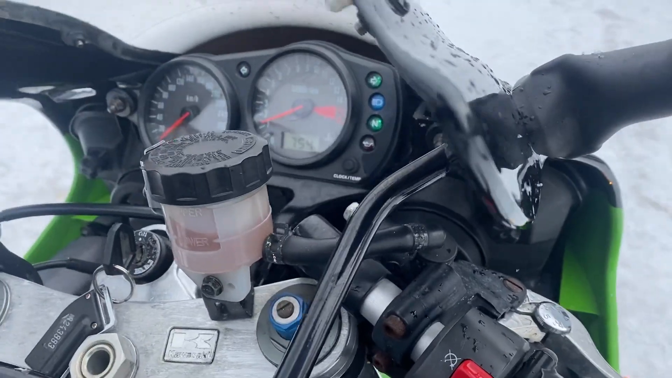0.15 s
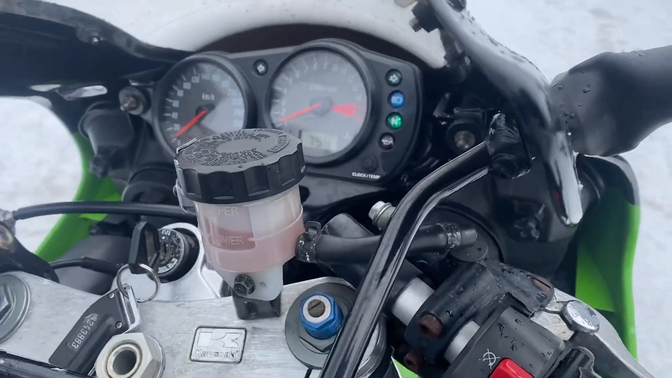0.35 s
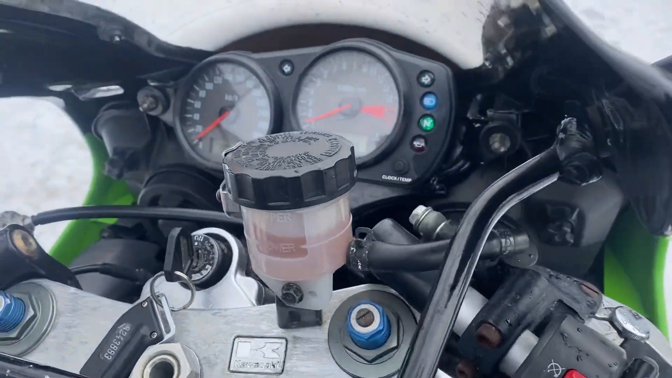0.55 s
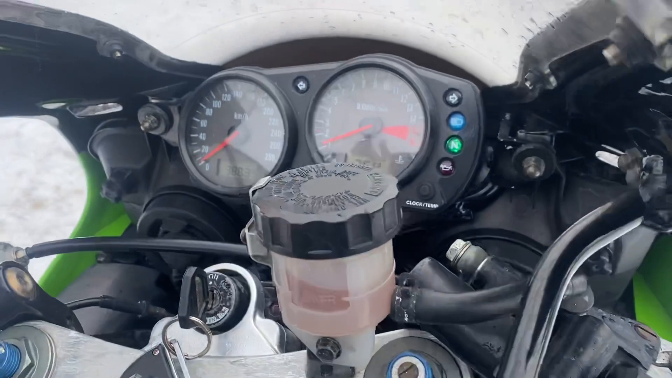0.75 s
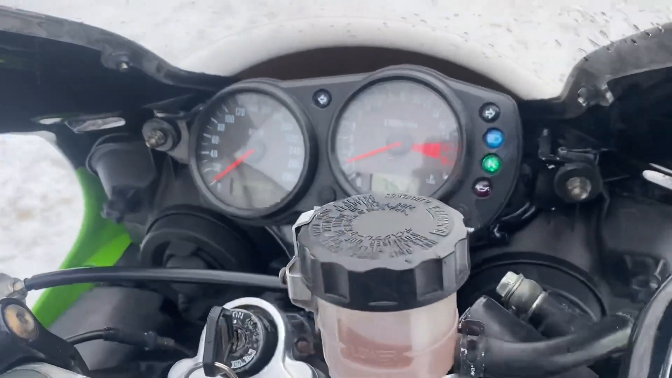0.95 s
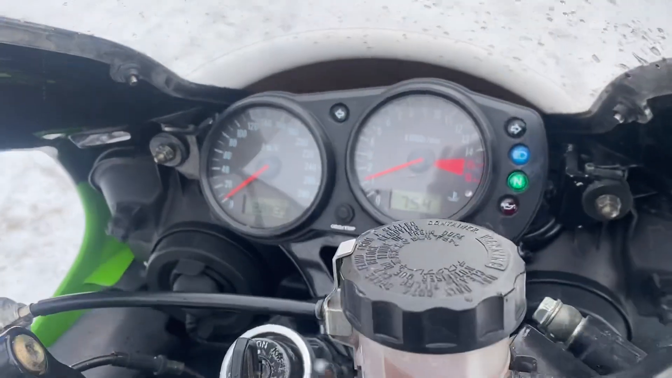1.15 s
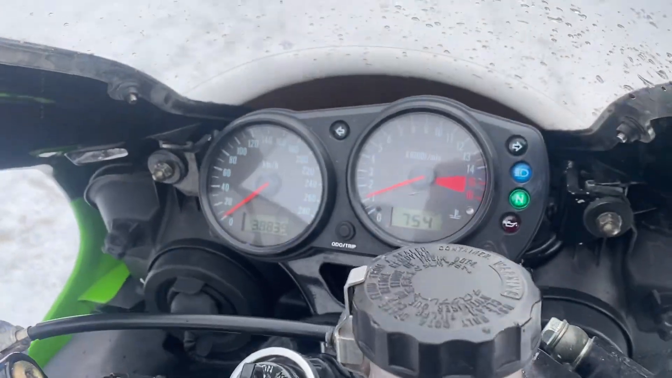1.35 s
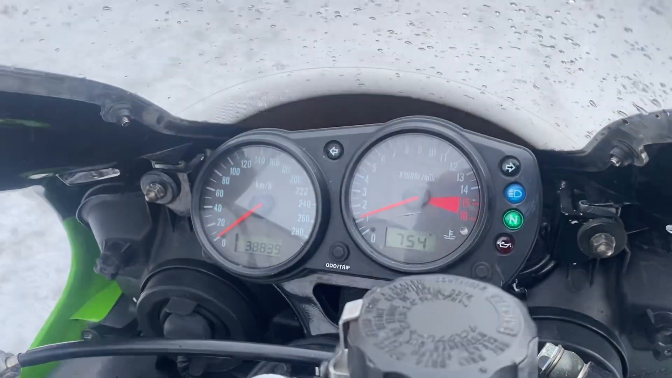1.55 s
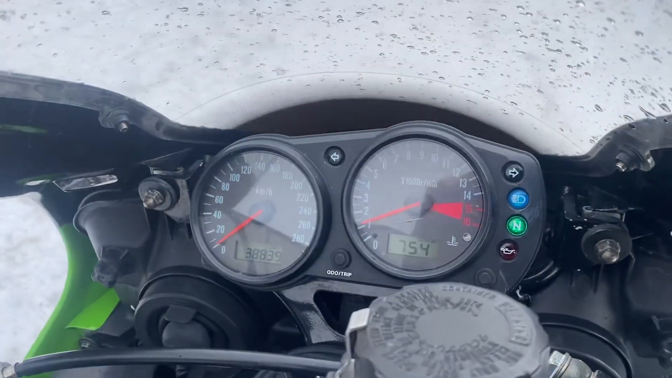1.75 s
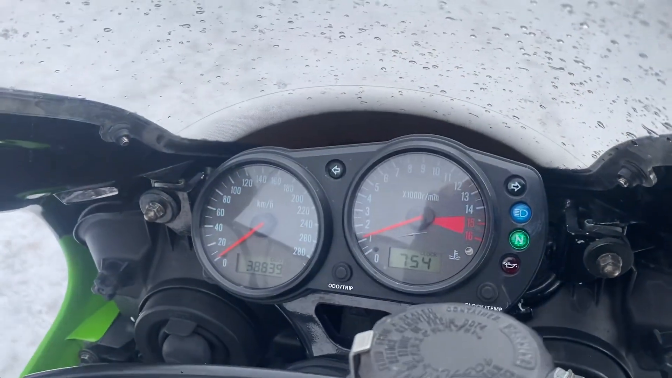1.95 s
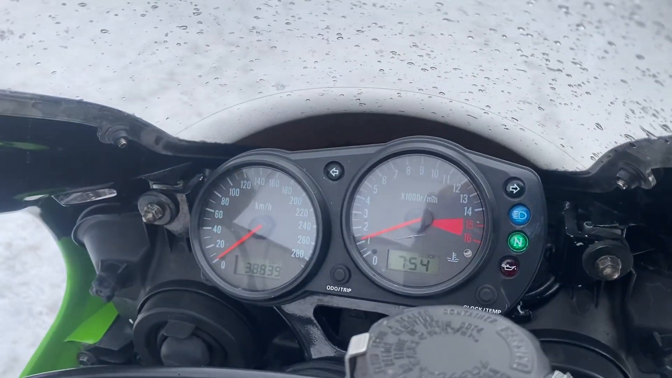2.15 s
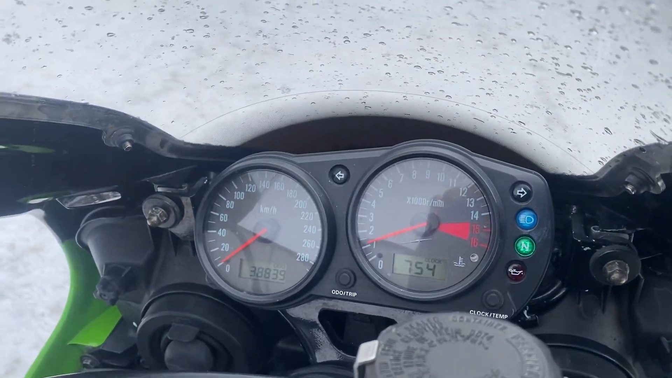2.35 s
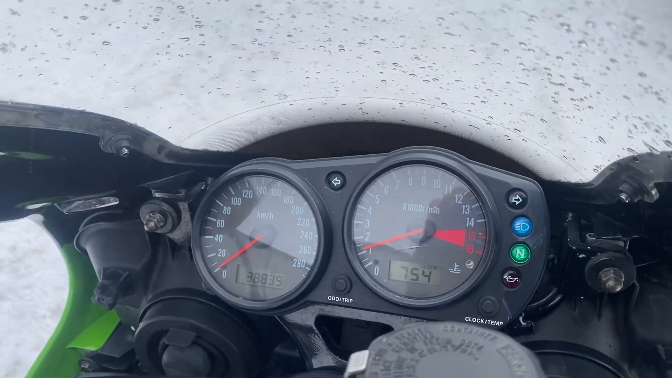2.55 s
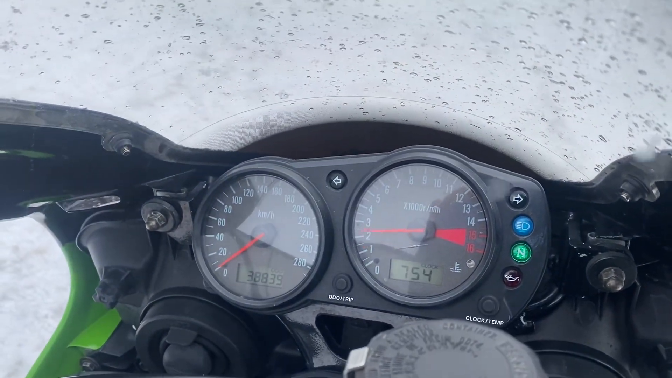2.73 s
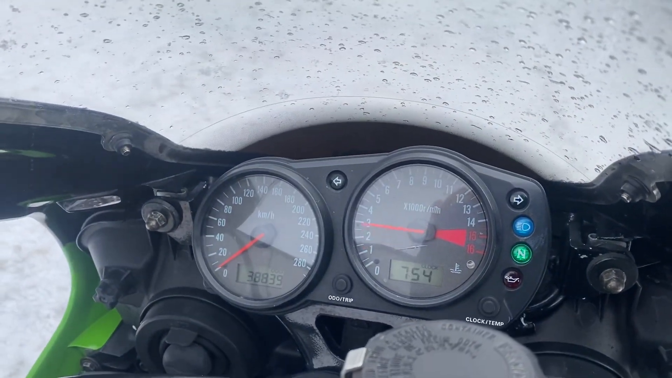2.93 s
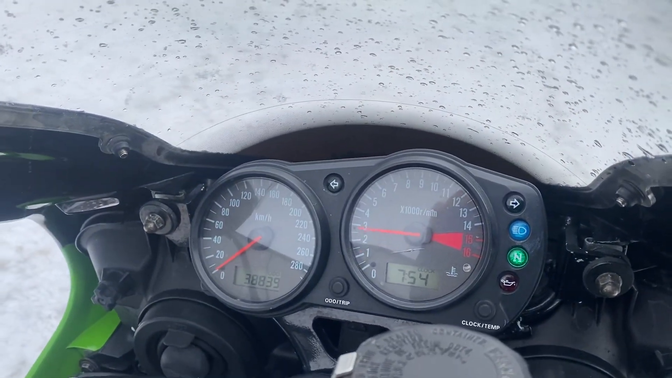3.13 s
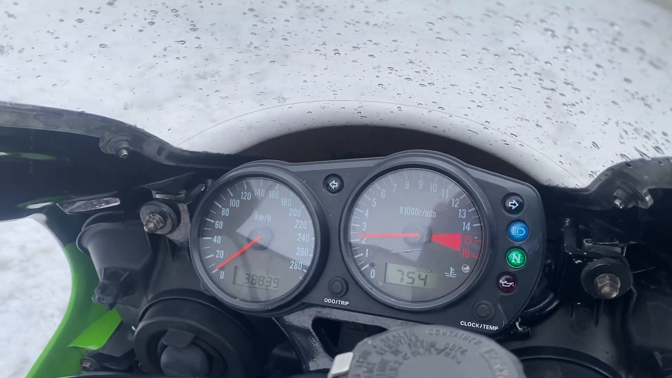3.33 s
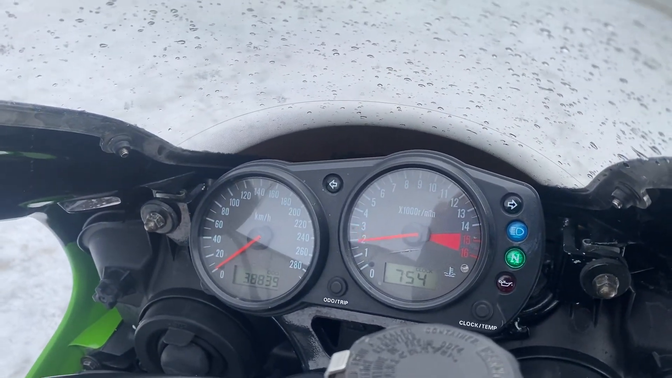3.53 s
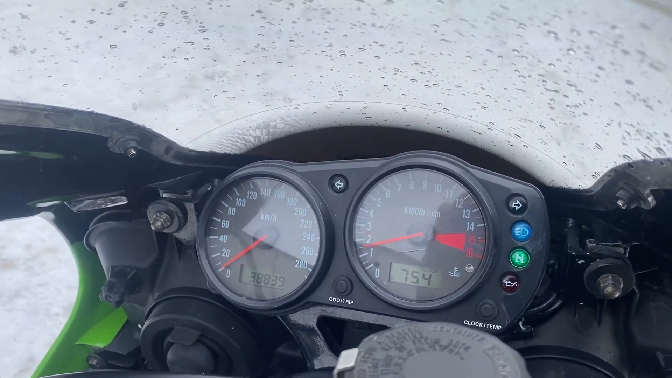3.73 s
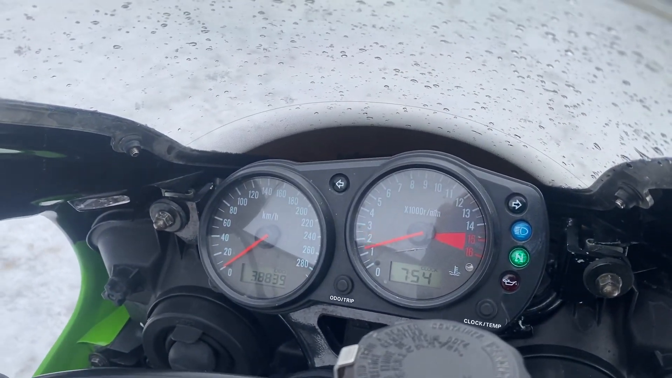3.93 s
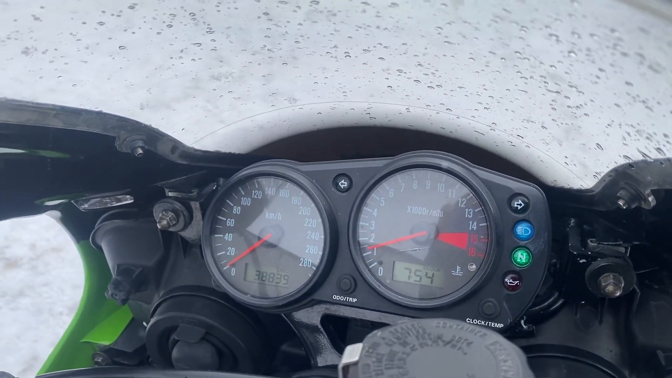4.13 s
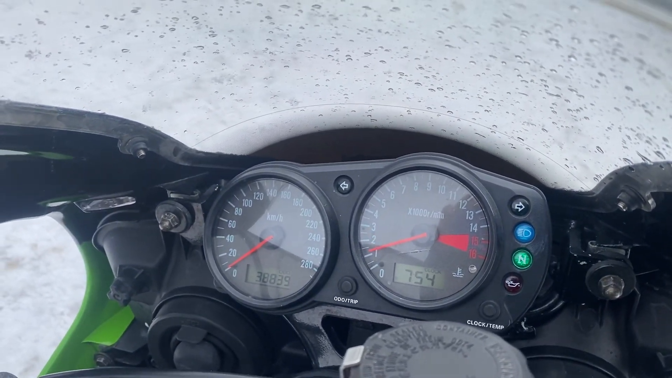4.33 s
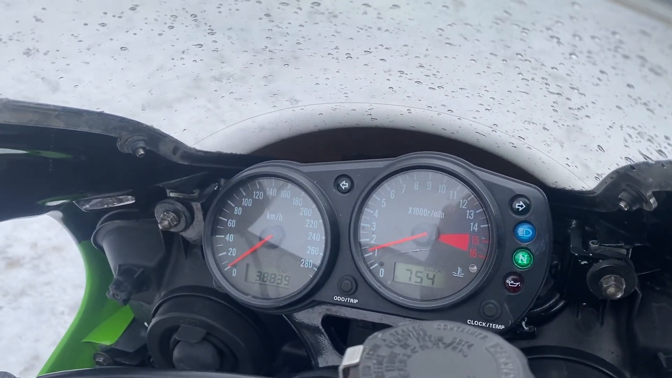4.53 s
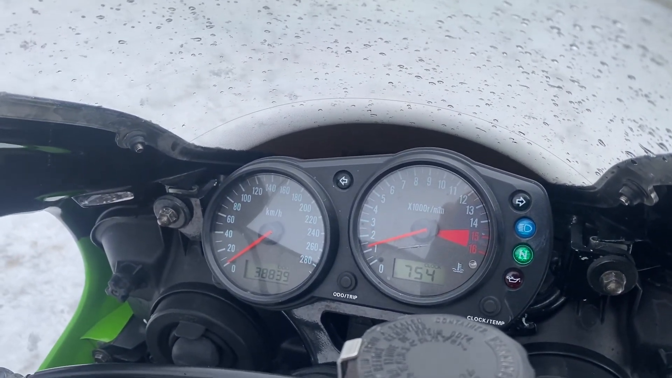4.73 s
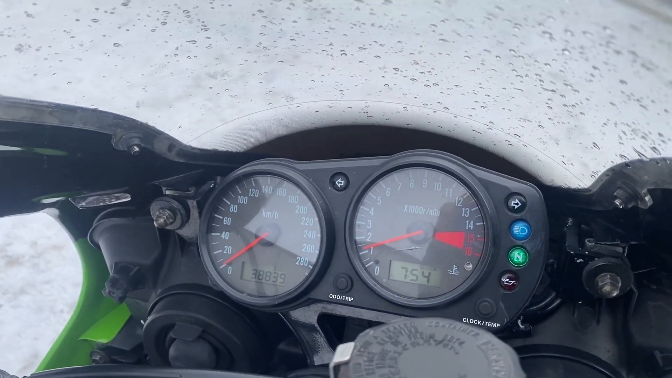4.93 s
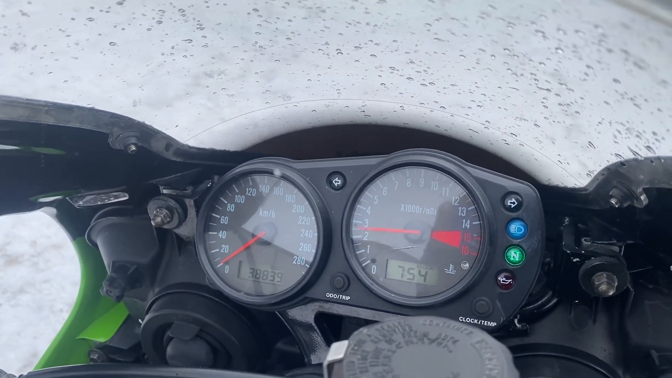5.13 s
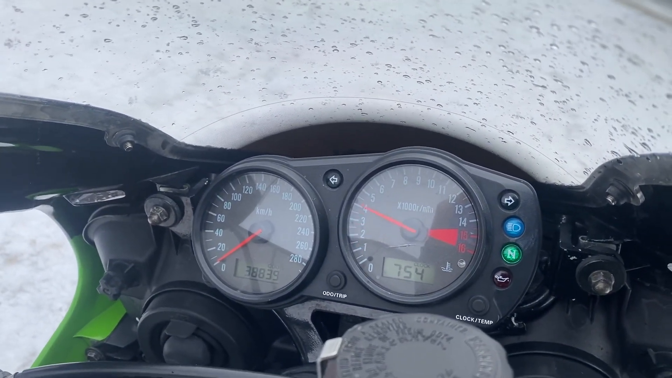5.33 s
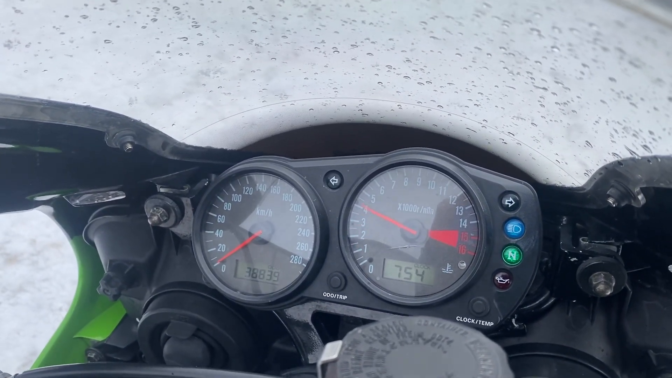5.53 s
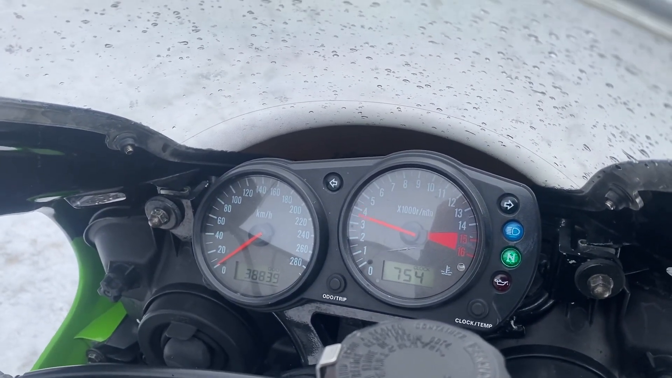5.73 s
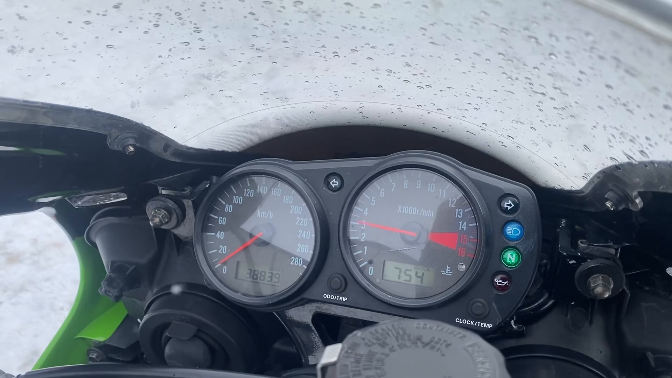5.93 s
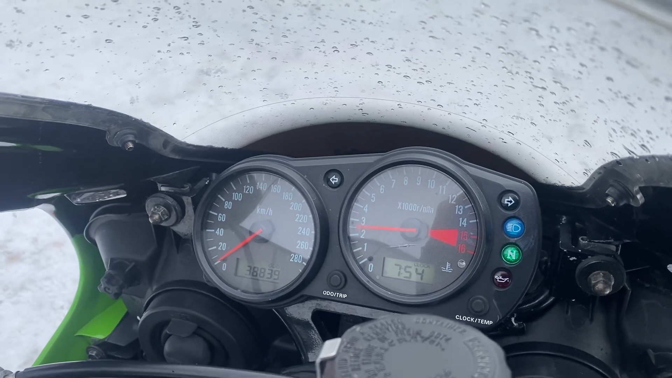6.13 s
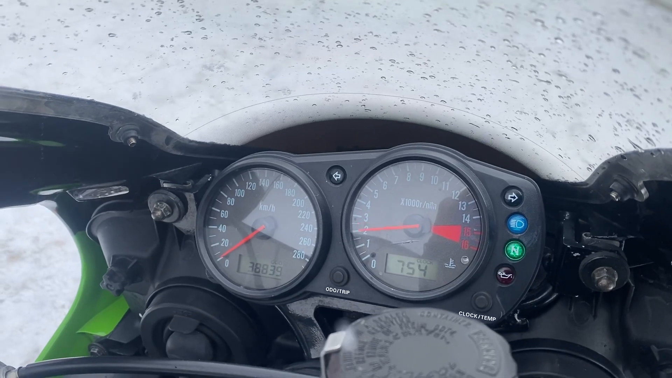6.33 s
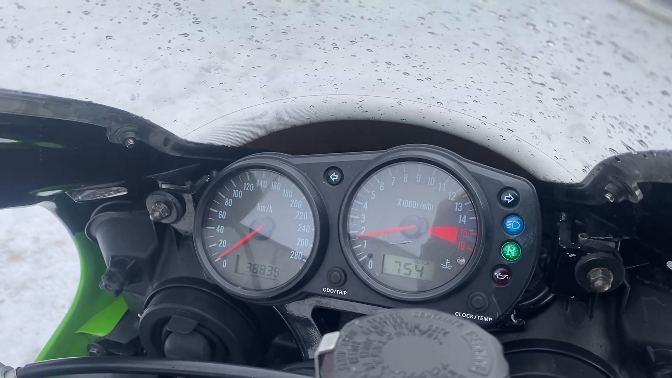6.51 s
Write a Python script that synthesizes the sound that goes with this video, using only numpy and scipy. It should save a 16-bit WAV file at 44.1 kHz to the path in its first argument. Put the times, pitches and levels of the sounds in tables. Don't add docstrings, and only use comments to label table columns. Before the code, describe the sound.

Close to a motorcycle outdoors, an uneven idle putters and ticks, jumps into a short rev, settles, then surges into a longer, louder rev and falls back.

```python
import sys
import numpy as np
from scipy import signal
from scipy.fft import rfft, irfft
from scipy.io import wavfile
from scipy.ndimage import uniform_filter1d

SR = 44100
rng = np.random.default_rng(int(sys.argv[2]) if len(sys.argv) > 2 else 0)


def int16_out(signal):
    q = np.round(np.clip(np.atleast_2d(signal).T, -1, 1) * 32767)
    wavfile.write(sys.argv[1], SR, q.astype(np.int16))


def makeup_ratio(level_db):
    decades = np.asarray(level_db, float) / 20
    return 10 ** decades


N = 289735
TIME = np.arange(N) / SR
IDLE_HZ = 45

# start_s, strength_db, wait_for_next_firing_ms
STUMBLES = [(0.046, -11.8, 21.2), (0.089, -12.7, 31.2), (0.209, -7.3, 21.2), (0.251, -8.6, 29.0),
            (0.416, -6.6, 25.6), (0.603, -5.8, 29.7), (0.722, -7.2, 24.2), (0.928, -8.6, 26.9),
            (1.099, -4.0, 28.1), (1.289, -4.8, 29.7), (1.48, -4.5, 29.7), (1.673, -4.4, 29.2),
            (1.885, -10.2, 28.4), (2.076, -7.2, 25.1), (2.264, -5.8, 23.9), (2.378, -5.7, 23.2),
            (2.453, -4.4, 23.6), (3.429, -6.7, 21.0), (3.528, -8.3, 21.6), (3.589, -5.2, 23.3),
            (3.772, -4.5, 25.4), (4.07, -4.0, 28.6), (4.254, -4.3, 24.9), (4.383, -14.3, 24.4),
            (4.429, -5.7, 25.8), (4.561, -8.5, 23.4), (4.793, -4.2, 27.4), (6.244, -6.0, 22.3),
            (6.338, -6.3, 19.3), (6.46, -8.1, 24.4)]
# idle_db, db_per_speed_doubling, extra_db_per_squared_doubling,
# open_throttle_db, fade_after_shutting_s
PIPE = (-34, 3.5, 1.83, 6.0, 0.21)
HISS = (-60.5, 9.5, -0.9, 3.5, 0.8)
# start_s, length_s, level_db
BRUSHES = [
    (0.027, 0.51, -58),
    (.35, 0.47, -50.5),
    (0.61, 0.46, -49.5),
    (1.6, 0.98, -60),
]


def crank():
    speed = firing_rate()
    turns = np.cumsum(speed) / SR
    s, _, wait_ms = np.transpose(STUMBLES)
    mark_s = np.sort(np.r_[s, s + wait_ms / 1000]) - .006
    marks = np.interp(mark_s, TIME, turns)
    whole = np.cumsum(np.round(np.diff(marks, prepend=marks[0])))
    hunt_turns = .035 * np.log(sway(per_s=25, depth_db=8.7))
    hunt = hunt_turns * np.clip(speed / IDLE_HZ - 1, 0, 1)
    along = np.interp(turns, marks, np.arange(len(marks)))
    count = np.diff(whole, append=whole[-1])[along.astype(int)]
    lag_turns = .13
    lag = lag_turns * np.sin(np.pi * along) ** 2 * (count > 2) * (count < 12)
    return np.maximum.accumulate(turns + np.interp(turns, marks, whole - marks) + hunt - lag)


def firings(turns, spread_db, pattern):
    cylinder_db = [-1.54, -3.1, -2.54, -2.24]
    recovery = [.55, .3, .12]
    lead_share = .45

    at = np.flatnonzero(np.diff(np.floor(turns)) > 0)
    revved = np.clip(firing_rate()[at] / IDLE_HZ - 1, 0, 3)
    chance = rng.standard_normal((1000, 1))[:len(at), 0]
    cylinder = turns[at + 1].astype(int) % 4
    db = pattern * (0.074 + 0.63 * revved) * np.take(cylinder_db, cylinder)
    db = db + spread_db * (1 + .4 * revved) * chance

    s, weak_db, _ = np.transpose(STUMBLES)
    weak = abs(at[:, None] / SR + .006 - s).argmin(0)
    db[weak - 1] += lead_share * weak_db
    for k, share in enumerate(recovery):
        db[weak + k + 1] += share * weak_db
    db[weak] = 1.25 * weak_db
    clicks = np.zeros(N)
    clicks[at] = makeup_ratio(db)
    return clicks


def exhaust(turns):
    # idle_db, db_per_speed_doubling, extra_db_per_squared_doubling, open_throttle_db,
    # fade_after_shutting_s
    puff_law = (-26.5, 4.0, -1.5, 4.0, 0.27)
    # pitch_hz, width_hz, level_db
    pipe_modes = [(206.7, 39, -4), (269.7, 29.3, 3), (327.8, 11.5, 6.5), (378.2, 27.5, -1), (455, 30, -3.5),
                  (489.1, 11, 5.5), (589, 29, -17.5), (807, 34, -3), (937, 122, -10)]
    # pitch_hz, width_hz, level_db
    airbox_modes = [(239, 4.7, -9), (348, 18, 3.5), (490, 69, -0.5), (788, 37, 4), (844, 17, -33)]
    puff_db, ring_db = loudness(puff_law), loudness(PIPE)
    speed = firing_rate()

    clicks = firings(turns, spread_db=.75, pattern=2.8)
    strength = np.r_[1, clicks[clicks > 0]][np.cumsum(clicks > 0)]
    open_share = np.minimum(0.013 * speed, .88)
    puff = strength * np.sin(np.pi * np.minimum(turns % 1 / open_share, 1)) ** 2
    puff = signal.lfilter(*signal.butter(1, 22, "high", fs=SR), puff)
    rumble = evened(band(rng.standard_normal(N), 30, 110)) * (.19 + .3 * (speed / IDLE_HZ - 1))

    blow_shape = np.hanning(int(.0024 * SR))
    blows = signal.oaconvolve(firings(turns, spread_db=2.2, pattern=1.3), blow_shape)[:N]
    blows = evened(band(blows, 175, 1220), 0.49)
    gas = evened(band(gusts(clicks, decay_s=0.0035, steady=0.39), 166, 755), 0.76)
    clean = np.clip(.32 + .06 * (speed / IDLE_HZ - 1), 0, .9)
    drive = np.roll(clean * blows + (1 - clean) * gas, int(0.00195 * SR))

    throttle = np.clip((ring_db + 31) / 12, 0, 1)
    howl = 1.3 * ring(drive, airbox_modes, between_db=-50)
    pipes = ring(drive, pipe_modes, between_db=-10) + throttle * howl
    puff, pipes = evened(puff, .3), evened(pipes, .25)
    boom_hz, boom_width_hz, boom_db = 103, 8.3, 2.5
    swell_db = boom_db * np.exp(-((speed - boom_hz) / boom_width_hz) ** 2)
    return makeup_ratio(puff_db) * (makeup_ratio(swell_db) * puff + rumble) + makeup_ratio(ring_db) * pipes


def orders(turns):
    # pitch_hz, level_db
    tract = [(110, -10), (160, -2), (205, 3.5), (255, 6), (295, -3), (328, 2), (385, -4), (420, -2),
             (450, 12), (485, -1), (620, -10)]
    # multiple_of_firing_rate, level_db
    singing = [
        (2, -1.5),
        (2.5, -10),
        (3, -4.5),
        (4, -9),
    ]
    coast_db = -3.5

    speed = firing_rate()
    hz, db = np.transpose(tract)
    awake = np.clip((speed - 52) / 25, 0, 1)
    tones = 0
    for k, order_db in singing:
        tract_db = np.interp(np.log(k * speed), np.log(hz), db)
        tone = np.sin(2 * np.pi * k * turns) * sway(per_s=25, depth_db=1.6)
        tones = tones + makeup_ratio(tract_db + order_db) * tone
    return makeup_ratio(loudness(PIPE) + coast_db * (2 - opening())) * awake * tones


def mechanics(turns):
    # idle_db, db_per_speed_doubling,
    # extra_db_per_squared_doubling, open_throttle_db, fade_after_shutting_s
    case_law = (-44.5, 4.0, 1.24, 4.0, 0.43)
    cover_law = (-52, 7.5, 0.85, 3.5, 1.53)
    # pitch_hz, width_hz, level_db
    case_modes = [(1150, 26, 2.5), (1497, 112, 7), (1742, 136, 1.5), (2112, 227, 5), (2626, 140, -8)]
    # pitch_hz, width_hz, level_db
    cover_modes = [(3787, 104, 3.5), (4320, 44, 0), (4600, 57, -8), (5260, 280, 4), (5400, 1900, -8),
                   (6520, 200, 4.5), (6990, 89, 3), (7340, 59, 7.5), (7590, 100, 0), (7870, 98, 11),
                   (7930, 330, 3.5), (9400, 1700, -8.5)]
    # pitch_hz, level_db (per Hz)
    air_colour = [(5290, -1.5), (9000, 4), (10100, 0), (13200, -4), (15100, -3), (15600, -6.5)]
    turn_db = [2.1, 4, 4.9, 7.5]

    toward_db = strokes(turn_db)
    case_db = loudness(case_law)
    cover_db = loudness(cover_law) + 0.15 * toward_db
    air_db = loudness(HISS) + toward_db

    slaps = np.roll(firings(turns, spread_db=3.2, pattern=2.5), int(.0055 * SR))
    knock = gusts(slaps, decay_s=0.008, steady=0.4)
    cases = ring(band(knock, 580, 3040), case_modes, between_db=-4.5)

    chain = evened(gusts(slaps, decay_s=0.062, steady=5.0))
    valves = evened(rattle(per_s=1400, spread_db=2.5))
    whirr = .5 * evened(knock) + chain + 1.5 * valves
    covers = ring(band(whirr, 3000, 9500), cover_modes, between_db=-8)

    hz = np.fft.rfftfreq(N, 1 / SR)
    f, db = np.transpose(air_colour)
    colour = makeup_ratio(np.interp(np.log(hz + 1), np.log(f), db, left=-99))
    air = irfft(rfft(gusts(slaps, decay_s=0.0059, steady=1.6)) * colour, N)
    air = air + ring(air, [(12800, 220, -5)], between_db=-60)

    bright = makeup_ratio(cover_db) * evened(covers, 0.11)
    bright = bright + makeup_ratio(air_db + 3.5) * evened(air, 0.1) * sway(per_s=40, depth_db=0.2)
    return makeup_ratio(case_db) * evened(cases, 0.079) + bright * sway(per_s=14, depth_db=0.92)


def ticks(turns):
    # start_s, peak_db
    clear_ticks = [(0.5112, -47), (0.7003, -51), (1.1737, -50), (1.3663, -47), (1.4566, -48), (1.5584, -51),
                   (1.6496, -46), (1.7504, -48), (2.6663, -41), (2.7397, -39), (2.8544, -42), (2.9856, -43),
                   (3.275, -46), (3.68, -58), (3.7753, -48), (4.3231, -57), (4.4084, -50), (4.5865, -66),
                   (4.7711, -51), (5.0305, -39), (5.4874, -36), (5.5398, -41), (5.6106, -39), (5.684, -38),
                   (5.7638, -37), (5.8052, -39), (5.8486, -35), (6.2627, -43), (6.3599, -45), (6.4418, -42)]
    tick_hz, spread_hz, faint_db = 14900, 600, 4

    t = np.arange(400) / SR
    clear = np.round(np.array(clear_ticks)[:, 0] * SR).astype(int)
    last_clear = np.maximum(np.searchsorted(clear, np.arange(N)) - 1, 0)
    since = turns - turns[clear][last_clear]
    each = np.flatnonzero(np.diff(np.floor(since / 2)) == 1)
    chance_db = 3.5 * rng.standard_normal((400, 1))[:len(each), 0]
    faint = np.c_[each / SR, loudness(HISS)[each] + faint_db + chance_db]

    rows = np.r_[clear_ticks, faint]
    out = np.zeros(N + len(t))
    for (s, db), grit in zip(rows, rng.standard_normal((500, len(t) + 1))):
        hz = tick_hz + spread_hz * np.tanh(grit[-1])
        burst = band(grit[:-1], hz - 1100, hz + 1100)
        burst = burst * np.exp(-t / .003) * np.minimum(t / .0008, 1)
        out[round(s * SR):][:len(t)] += makeup_ratio(db + 2.0) * burst / abs(burst).max()
    return out[:N]


def buzz():
    # time_s, level_db, pitch_hz
    buzz_path = [
        (0, -56, 4880),
        (.24, -52, 4880),
        (.42, -62, 4790),
        (.75, -60, 4600),
        (1, -79, 4500),
        (1.8, -69, 4600),
        (2, -53, 4620),
        (2.2, -58, 4600),
        (2.4, -67, 4600),
    ]
    width_hz = 230
    db, hz = curves(buzz_path)
    fuzz = signal.lfilter(*signal.butter(1, width_hz / 2, fs=SR), rng.standard_normal((2, N)))
    carrier = np.exp(2j * np.pi * np.cumsum(hz) / SR)
    whistle = ((fuzz[0] + 1j * fuzz[1]) * carrier).real
    return makeup_ratio(db) * sway(per_s=28, depth_db=3.2) * evened(whistle)


def rustle():
    grains = evened(rattle(per_s=9500, spread_db=-3.0)) + rng.standard_normal(N)
    level = strokes(makeup_ratio(np.array(BRUSHES)[:, 2]))
    return level * sway(per_s=28, depth_db=2) * evened(band(grains, 2500, 5500))


def firing_rate():
    # time_s, firing_rate_hz
    speed_path = [(0, 44.2), (2.44, 42.5), (2.51, 51.1), (2.61, 88.06), (2.69, 111.8), (2.78, 104),
                  (3.29, 62.45), (3.6, 43.4), (4.8, 44.47), (4.92, 66.74), (5.06, 116.9), (5.2, 146.2),
                  (5.29, 150.6), (5.43, 127.4), (5.8, 98.67), (6.17, 63.06), (6.42, 48.1), (6.57, 47.7)]
    return curves(speed_path)[0]


def opening(shut_s=0.043):
    # open_s, shut_s, opening (0-1)
    blips = [
        (2.458, 2.61, 0.89),
        (4.83, 5.19, 1),
    ]
    open_s = 0.072
    total = 0
    for a, b, share in blips:
        total = total + share * np.interp(TIME, [a, a + open_s, b, b + shut_s], [0, 1, 1, 0])
    return total


def loudness(law):
    doublings = np.log2(firing_rate() / IDLE_HZ)
    idle_db, slope_db, bend_db, load_db, shut_s = law
    return idle_db + slope_db * doublings + bend_db * doublings ** 2 + load_db * opening(shut_s)


def gusts(clicks, decay_s, steady):
    flare = signal.lfilter([1], [1, -np.exp(-1 / (decay_s * SR))], clicks)
    return (steady + uniform_filter1d(flare, 60)) * rng.standard_normal(N)


def rattle(per_s, spread_db):
    size = makeup_ratio(spread_db * np.minimum(rng.exponential(1, N), 5))
    hits = rng.random(N) < per_s / SR
    return size * hits * rng.choice([-1, 1], N)


def strokes(sizes):
    total = 0
    for (s, length, _), size in zip(BRUSHES, sizes):
        total = total + size * np.sin(np.pi * np.clip((TIME - s) / length, 0, 1)) ** 2
    return total


def sway(per_s, depth_db):
    hz = np.geomspace(per_s / 8, per_s, num=24)
    coarse = TIME[::256]
    waves = np.sin(2 * np.pi * (hz * coarse[:, None] + rng.random(len(hz)))) / np.sqrt(hz)
    return makeup_ratio(depth_db * np.interp(TIME, coarse, evened(waves.sum(1))))


def ring(x, modes, between_db):
    out = makeup_ratio(between_db) * x
    for k, (hz, width, db) in enumerate(modes):
        mode = signal.lfilter(*signal.iirpeak(hz, hz / width, SR), x)
        out = out + (-1) ** k * makeup_ratio(db) * mode
    return out


def band(x, lo_hz, hi_hz):
    edges = [lo_hz, min(hi_hz, SR / 2.1)]
    return signal.sosfilt(signal.butter(2, edges, "band", fs=SR, output="sos"), x)


def evened(x, span=None):
    if span is None:
        power = np.mean(x ** 2)
    else:
        width = int(span * SR)
        power = uniform_filter1d(uniform_filter1d(x ** 2, width), width)
    return x / np.sqrt(abs(power) + 1e-20)


def curves(rows):
    s, *columns = np.transpose(rows)
    return [np.interp(TIME, s, c) for c in columns]


def scene():
    turns = crank()
    engine = exhaust(turns) + orders(turns) + mechanics(turns) + ticks(turns)
    return (engine + buzz() + rustle())[None]


def roll_off(x):
    return signal.sosfilt(signal.butter(12, 15730, fs=SR, output="sos"), x)


def record(dry):
    cut = signal.filtfilt(*signal.butter(2, 22, "high", fs=SR), dry)
    top_hz = 15740
    lowpass = signal.firwin(511, top_hz, window=("kaiser", 9), fs=SR)
    cut = signal.oaconvolve(cut, lowpass[None], "same")
    cut = .95 * np.tanh(cut / .95)
    return roll_off(cut)


dry = scene()
out = record(dry)
int16_out(out)
```